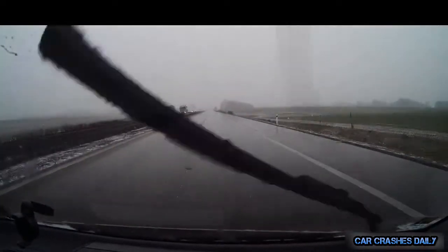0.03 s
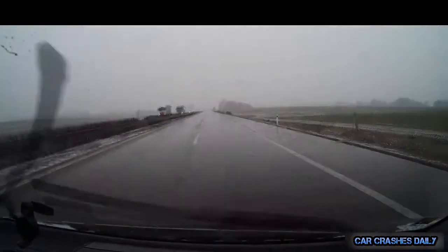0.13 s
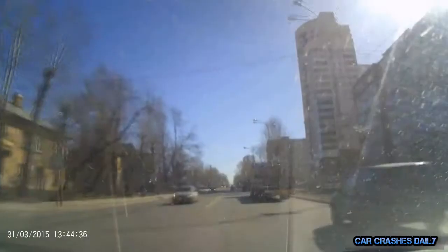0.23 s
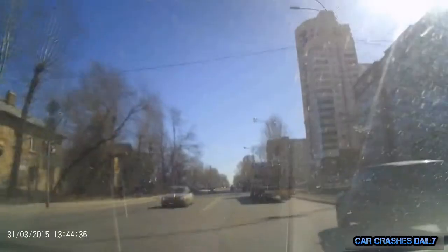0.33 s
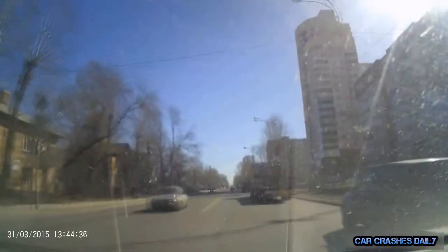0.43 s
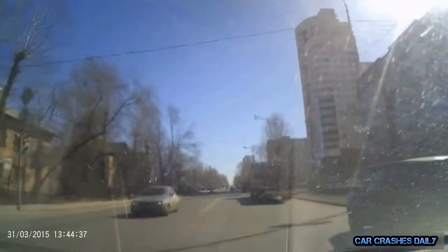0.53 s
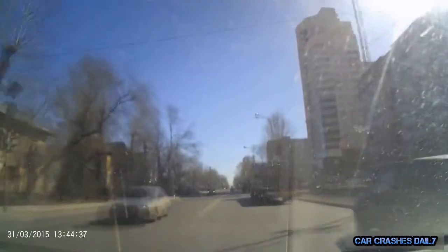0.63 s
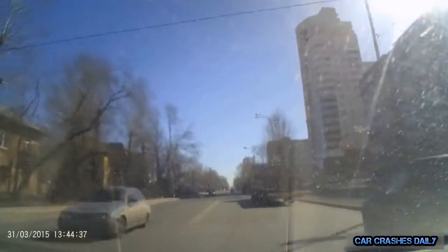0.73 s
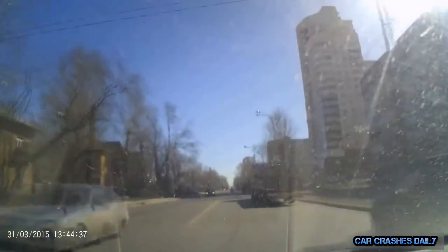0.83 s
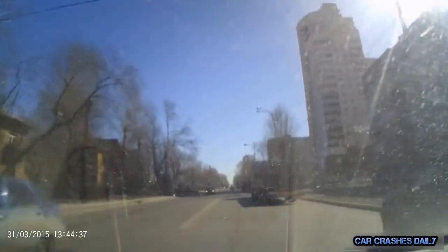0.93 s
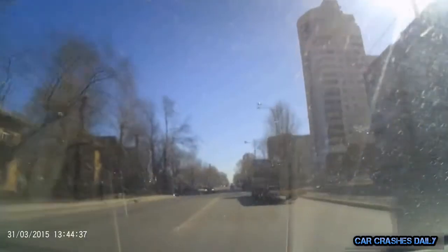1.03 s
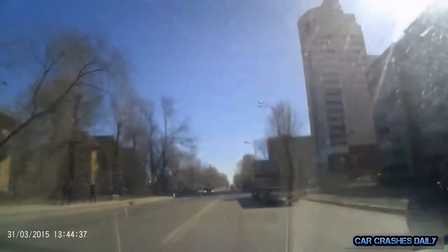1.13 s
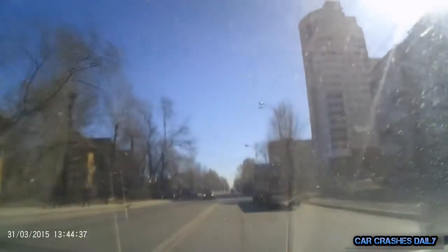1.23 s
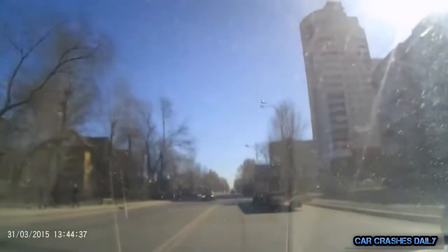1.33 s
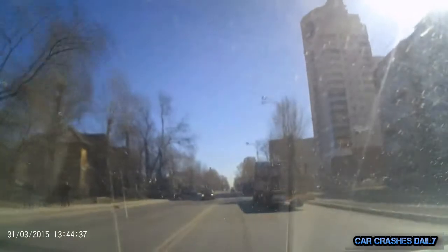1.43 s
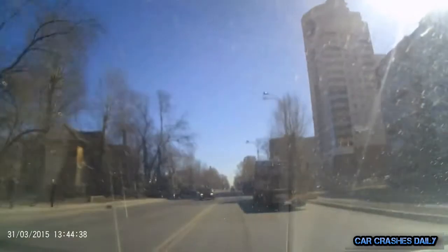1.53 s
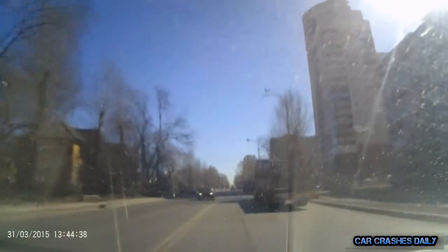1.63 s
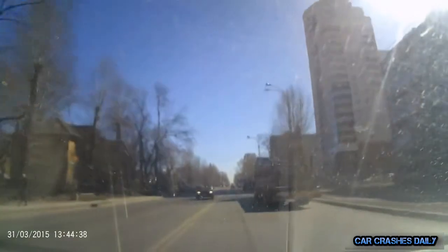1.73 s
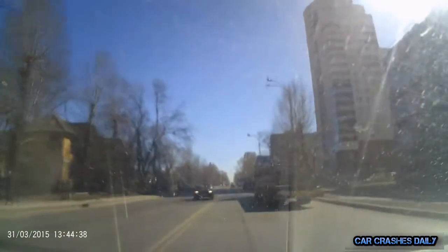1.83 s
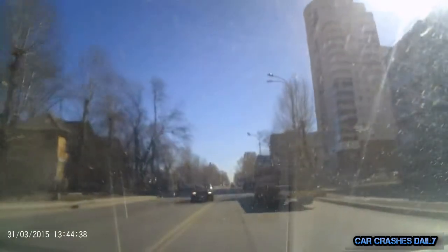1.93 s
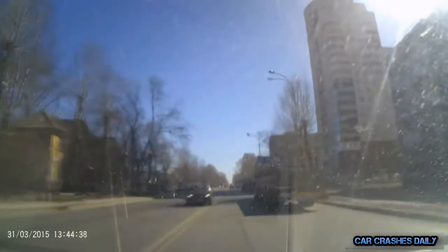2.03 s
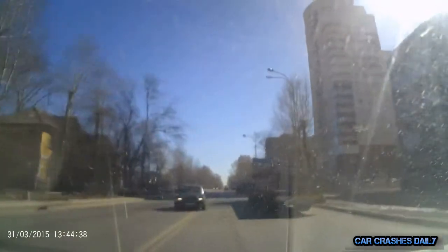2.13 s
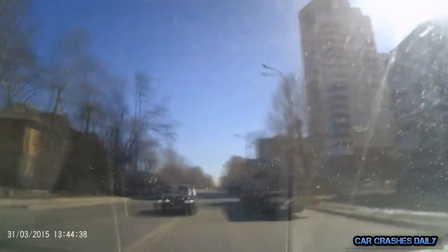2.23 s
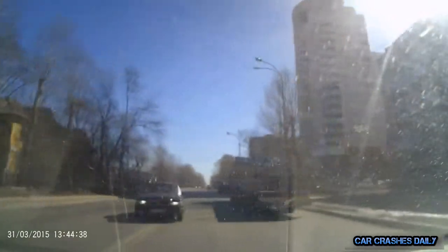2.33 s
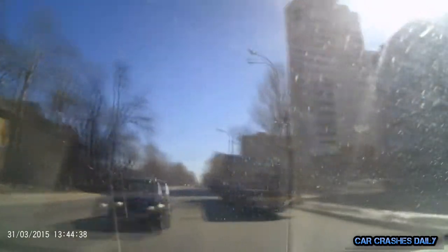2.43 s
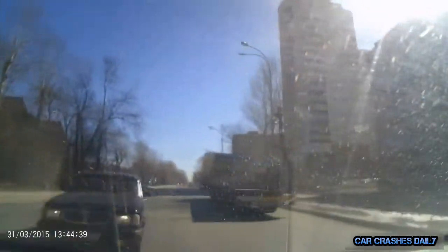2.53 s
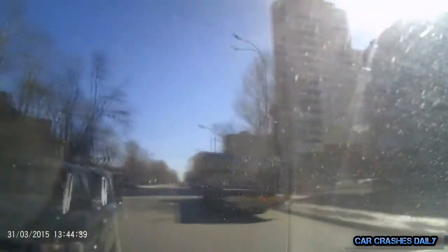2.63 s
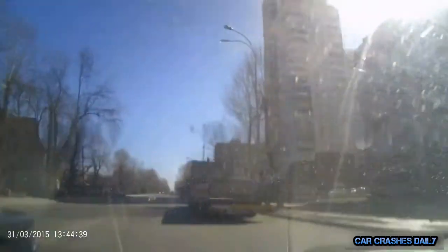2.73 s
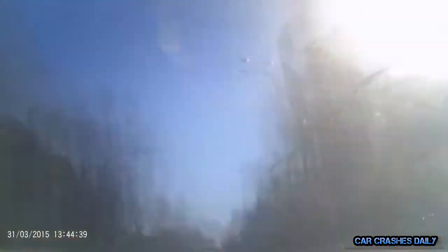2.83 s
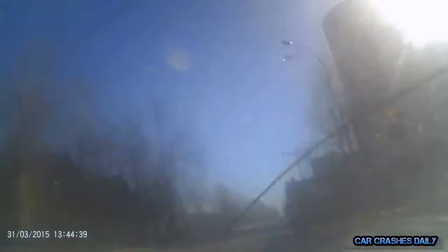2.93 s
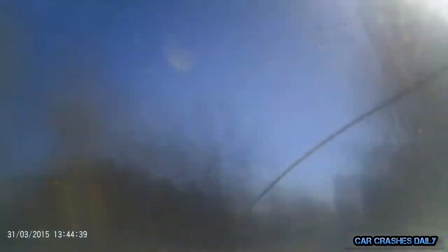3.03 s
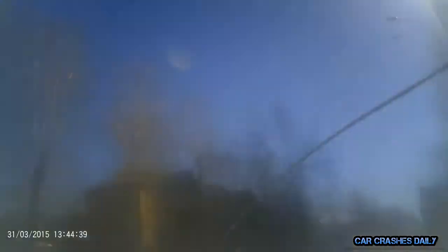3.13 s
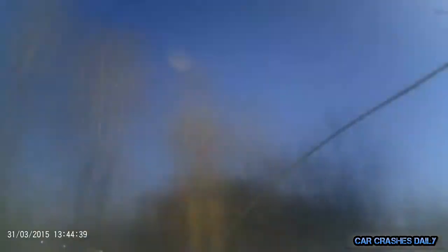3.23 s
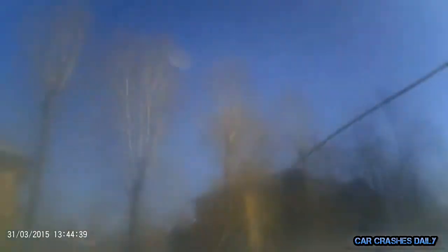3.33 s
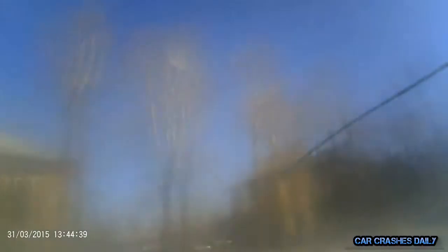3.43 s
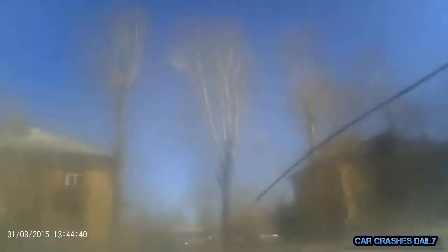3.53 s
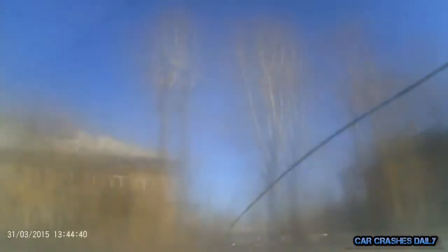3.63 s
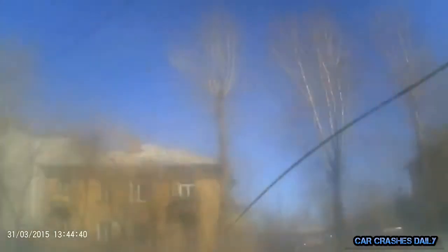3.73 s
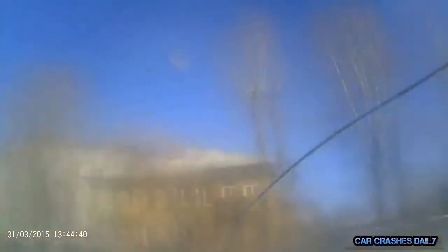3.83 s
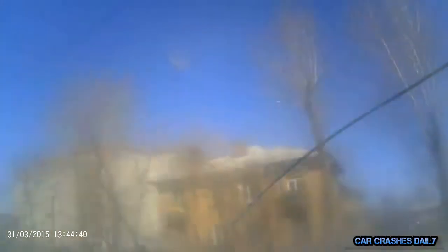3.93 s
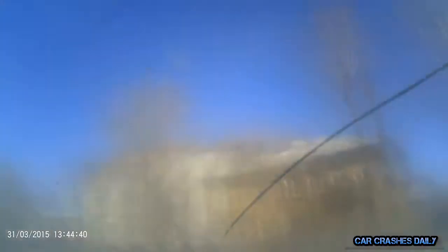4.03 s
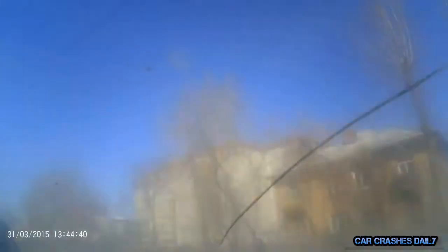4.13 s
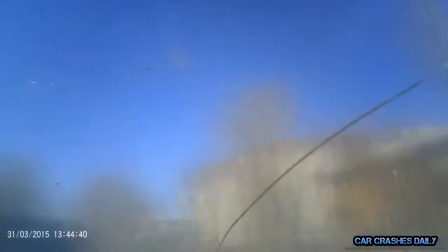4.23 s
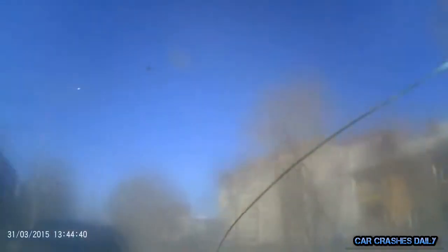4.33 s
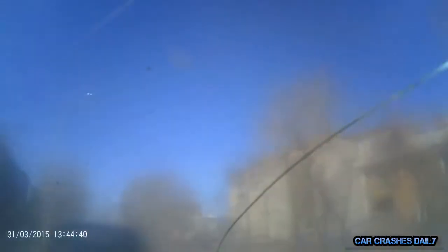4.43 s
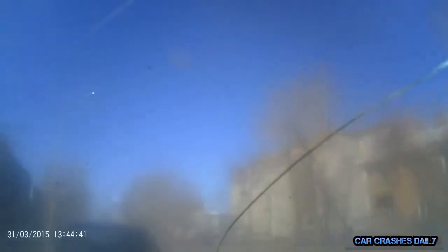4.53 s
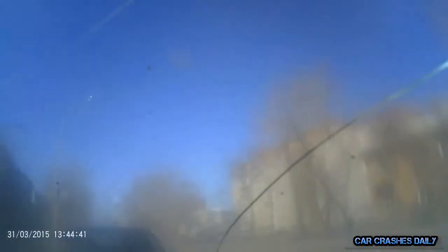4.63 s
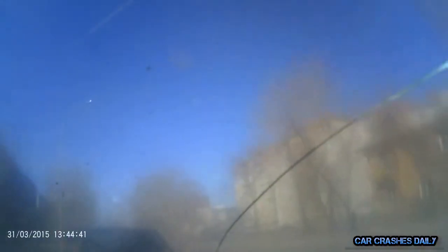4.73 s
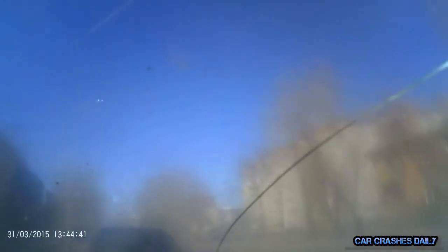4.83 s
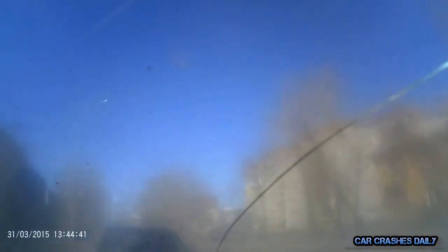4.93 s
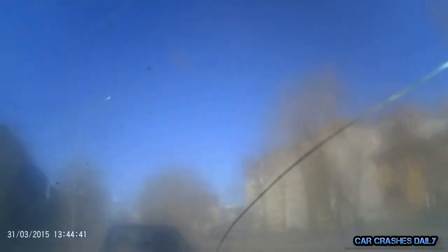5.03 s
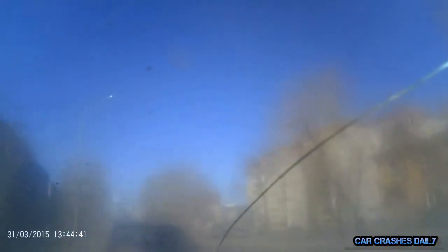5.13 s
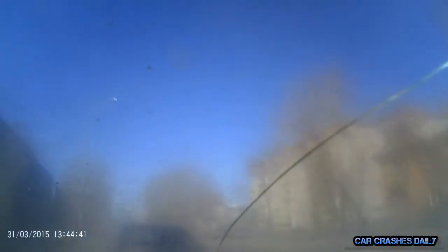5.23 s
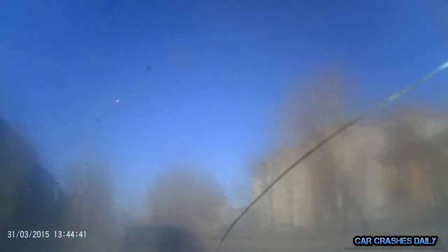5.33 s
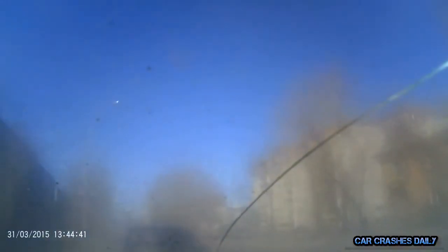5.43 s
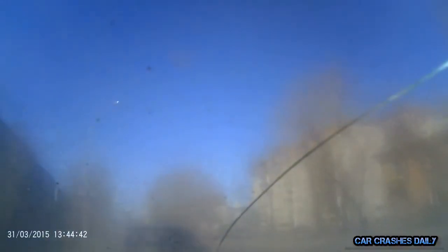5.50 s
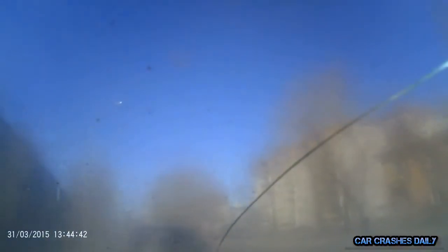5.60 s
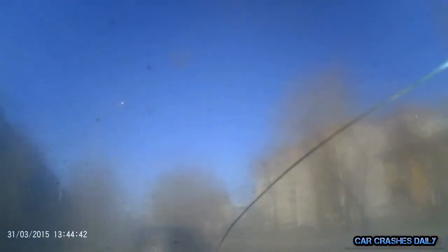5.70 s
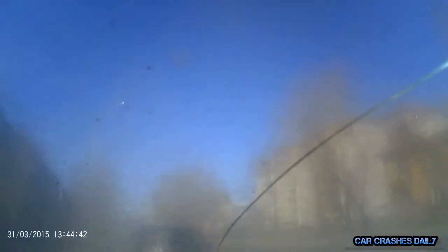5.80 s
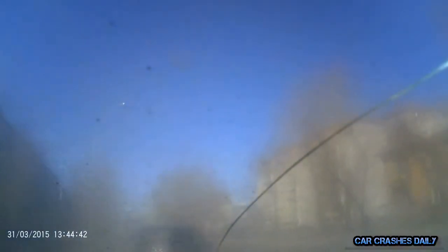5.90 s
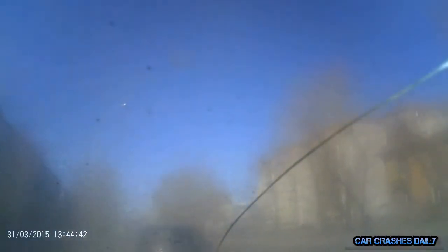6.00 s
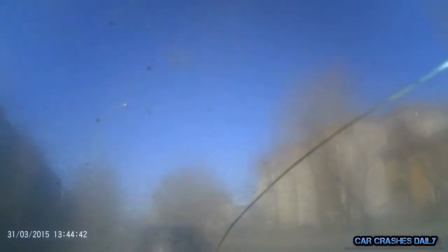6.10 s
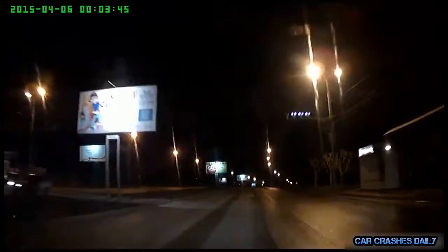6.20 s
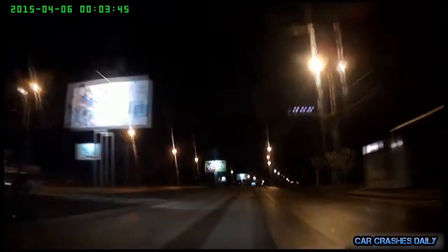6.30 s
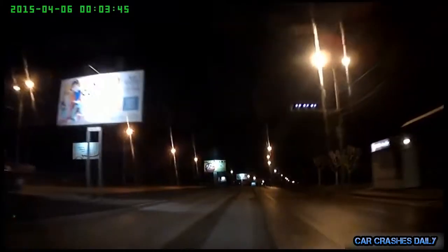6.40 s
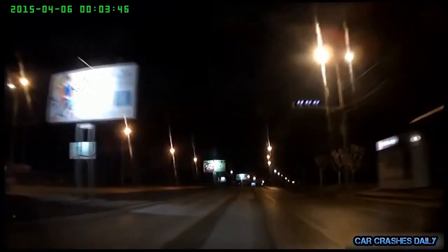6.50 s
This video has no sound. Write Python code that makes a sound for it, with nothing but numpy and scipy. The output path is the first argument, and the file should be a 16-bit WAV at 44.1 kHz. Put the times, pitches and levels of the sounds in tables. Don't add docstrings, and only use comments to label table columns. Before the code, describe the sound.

Close inside a car cabin, tyres and engine rumble low with faint air hiss. Suddenly two crushing impacts overload the microphone, with tearing metal and harsh fizz. The wreck slides: rough broken rubber squeals, metal scraping, dense cracks, heavy knocks and small ringing clinks. It lurches over a kerb with deep thumps, debris thins out, and the engine's low tone sinks until an abrupt cut.

```python
import sys
import numpy as np
from scipy import signal
from scipy.fft import rfft, irfft
from scipy.io import wavfile
from scipy.ndimage import uniform_filter1d

SR = 44100
rng = np.random.default_rng(int(sys.argv[2]) if len(sys.argv) > 2 else 0)


def amplitude_ratio(level_db):
    exponent = np.asarray(level_db, float) / 20
    return 10 ** exponent


def digitize_waveform(pressure):
    field = np.atleast_2d(pressure).T
    bounded = np.clip(field, -1, 1)
    quanta = np.round(bounded * 32767).astype(np.int16)
    wavfile.write(sys.argv[1], SR, quanta)


N = 289296
T = np.arange(N) / SR

# f/Hz, level per Hz/dB
ROAD_SPECTRUM = [(12, -32), (20, -0.5), (69, -1), (98, -9.5), (134, -6.5), (163, -20), (219, -20.5),
                 (261, -25.5), (376, -27), (418, -29), (693, -34.5), (870, -33.5), (1300, -49),
                 (1690, -72.5), (2860, -120)]
# f/Hz, level per Hz/dB
HISS_SPECTRUM = [(710, -21.5), (1200, -1), (1410, -1), (1650, -9), (2040, -10.5), (2600, -16.5),
                 (3840, -18.5), (5440, -26), (6940, -22.5), (8210, -25), (10400, -21), (11200, -29.5),
                 (14300, -28), (15000, -43.5)]
ROAD_DB, HISS_DB = -17.5, -47.5
# f/Hz, width/Hz, level/dB, unsteadiness/dB
PANEL_HUM = [
    (363.5, 32, -47.5, 4.5),
    (870, 54, -50, -0.5),
    (6960, 820, -70.5, 6.5),
    (3800, 220, -67, 2),
]

# t/s, peak level/dB, ring f/Hz, ring level re peak/dB
HARD_CRACKS = [(2.46, -39, 3230, -4), (2.9295, 0, 4120, -6.5), (2.9618, -9.5, 5430, -14.5),
               (3.009, -11, 3960, -17), (3.0535, -14, 3850, -20), (3.127, -5.5, 2980, -13),
               (3.1672, -7.5, 4150, -10), (3.1998, -8.5, 4070, -7), (3.2302, -1, 3980, -27),
               (3.291, -8, 4140, -25), (3.473, -5.5, 4240, -14), (3.3393, -15.5, 3100, -11),
               (3.5058, -16, 3420, -5), (3.6522, -9, 3730, -20), (3.5647, -1, 3480, -31),
               (3.6667, -8.5, 3725, -25), (3.688, -9.5, 3050, -10), (3.7109, -4, 3330, -18),
               (3.792, -3.5, 3090, -11), (3.8247, -9, 3800, -11), (3.8602, -4, 3110, -9),
               (3.8907, -7, 3010, -4), (3.955, -7.5, 3850, -12), (4.05, -26.5, 2600, -10),
               (4.1326, -17, 2210, -3.5), (4.4393, -26, 3670, -15), (4.495, -17.5, 3670, -4.5),
               (4.55, -20, 2780, -16), (4.583, -19, 2380, -13), (4.609, -17.5, 3330, -13),
               (4.8924, -21, 3670, -15), (5.095, -19, 2820, -23), (5.1825, -24, 2210, -21),
               (4.5133, -13, 2980, -15), (4.621, -16.5, 5050, -8), (4.818, -9.5, 3250, -16),
               (4.857, -14, 2280, -9), (4.983, -18.5, 3080, -26), (4.93, -19.5, 2500, -20),
               (4.475, -23.5, 2800, -10), (5.1372, -17, 2550, -30), (5.508, -27.5, 2990, -16),
               (5.555, -21, 2798, -15), (5.8576, -33.5, 3220, 0)]
# t/s, peak level/dB, thud level re peak/dB
HEAVY_KNOCKS = [(2.956, -23.5, 22.5), (3.07, -21, 8.5), (3.098, -13.5, 17), (3.1663, -14, 14.5),
                (3.1995, -16.5, 17.5), (3.3624, -13.5, 16), (3.4219, -15, 17), (3.668, -5.5, 6),
                (3.794, -11.5, 13.5), (4.0832, -12, 18), (4.108, -16, 12), (4.178, -21, 12),
                (4.2121, -21, 13), (4.239, -17.5, 0), (4.278, -18.5, -2), (4.3519, -15, 19),
                (4.398, -13, 5), (4.4296, -15, 8), (4.4642, -19.5, 28), (4.03, -18, 16), (4.659, -25.5, 21),
                (4.8007, -29, 19), (4.9181, -20.5, 8.5), (4.9666, -11, 6.5), (5.228, -15, 9.5),
                (2.89, -17.5, 11), (2.924, -17, 9), (4.06, -26, 16), (4.905, -26, 19),
                (5.6097, -35.5, 25.5)]
CRACK_T60_S, KNOCK_T60_S, CRACK_THUD_DB = 0.053, 0.052, -1

# t/s, cabin pressure/rails, crunch level re rail/dB
BLOWS = [(2.541, 2.5, 4.5), (2.557, 9, 11.5), (2.565, -8, 15.5), (2.568, 14.5, -7), (2.571, -5, 7),
         (2.579, 2, 8.5), (2.59, -16, 4), (2.614, -14, -30), (2.6326, -1, -25.5), (2.635, -1, -38.5),
         (2.647, -1, -20.5), (2.661, -5, 20), (2.686, -5.5, 11), (2.696, -3, 19), (2.7, -5, 8),
         (2.709, 6, 14.5), (2.727, 3.5, 10), (2.736, 6.5, 6.5), (2.744, -2.5, -16)]
# t/s, held/s, pressure/rails, pressure under/rails, crunch level/dB
REBOUNDS = [
    (2.772, 0.01, 0.83, -1.46, -11),
    (2.827, 0.0041, 0.37, -1.28, -15.5),
    (2.867, .011, 0.71, -0.75, -13.5),
    (2.912, 0.013, 1.03, -0.98, -21),
]
SECOND_BLOW_S, BLOWS_END_S, SETTLED_S = 2.589, 2.748, 2.956
BUMPER_HZ, SHEET_HZ, TRIM_HZ = 480, 2750, 2000
LET_GO_S, LET_GO_TILT, HELD_DB, UNDER_DB = 0.008, 0.66, -4.5, -14

# t/s, boom level/dB
CABIN_BOOM = [(2.93, -6), (3.32, -19.5), (3.95, -17.5), (4.15, -12.5), (4.5, -22), (4.8, -12.5),
              (5.3, -14.5), (5.85, -18.5), (6.03, -11), (6.17, -26)]
# t/s, weight on the ground level/dB, sliding speed level/dB
SLIDE_PATH = [(2.93, -2, 0), (3.8, -3, 2), (3.92, -7, 0), (4.0, -5, -2.5), (4.24, 6, -11), (4.62, -3, -10),
              (4.95, -3.5, -15), (5.07, -4.5, -14.5), (5.3, -5, -24), (5.4, -5.5, -25), (5.98, -4.5, -29.5),
              (6.15, -13, -22)]
# t/s, length/s, wheel lift level/dB, floor pan lift level/dB
GROUND_BUMPS = [(2.978, 0.04, -13, 5.5), (3.022, 0.049, 4, 6.5), (3.089, 0.079, 10, 5.5),
                (3.38, 0.076, 5, 2), (3.691, 0.073, 10, 5), (4.096, 0.13, 10, 7.5), (3.904, .2, 5, 1.5),
                (4.22, 0.16, 1, 3.5), (4.678, 0.067, 10.5, 15.5), (4.83, 0.092, 7, 7.5),
                (4.954, 0.29, 2.5, 11), (5.294, 0.12, 1.5, 6), (5.556, 0.15, -4, 8.5),
                (5.978, 0.26, -10, 3)]
# t/s, length/s, level/dB
LULLS = [(3.046, 0.015, -10), (3.222, 0.017, -8), (3.464, 0.011, -7), (3.647, 0.035, -3), (3.853, .02, -1),
         (3.885, 0.019, -2), (4.023, 0.014, -8.5), (4.169, 0.011, -11), (4.422, 0.011, -9),
         (4.487, 0.015, -13), (4.537, .02, -4), (4.642, .02, -2.5), (4.72, 0.013, -5), (4.782, 0.03, -4),
         (4.845, 0.018, -0.5), (4.887, .03, -4), (4.94, 0.022, -2.5), (5.058, 0.036, -4.5),
         (5.204, .03, -0.5)]
# base level/dB, powers of weight, speed, wheel bumps, floor pan bumps [no unit]
LAYER_FOLLOWS = [
    (-19, 0.92, 0.011, 1.21, .01),
    (-23.5, 1.12, 0.0088, 0.19, 1),
    (-18.5, 0.55, 0.53, .01, 0.36),
    (-27, 0.011, 1, .01, 0.24),
]
# f/Hz, level per Hz/dB
THUMP_SPECTRUM = [(26, -44), (45, -7), (53, -3), (70, -7), (81, -9), (124, -12), (135, -3), (162, -12.5),
                  (200, -24.5), (260, -48), (440, -120)]
# f/Hz, level per Hz/dB
RUMBLE_SPECTRUM = [(100, -43), (170, -2.5), (264, -5.5), (316, -3.5), (545, -10), (601, -12), (695, -17.5),
                   (900, -11.5), (1170, -65.5), (1980, -120)]
# f/Hz, level per Hz/dB
SCRAPE_SPECTRUM = [(240, -35), (400, -34.5), (426, -8.5), (671, 0), (803, -0.5), (1090, 0), (1280, -0.5),
                   (1560, 2), (1700, -4), (2600, -15), (3380, -16.5), (5720, -120)]
# f/Hz, level per Hz/dB
DEBRIS_SPECTRUM = [(1060, -29.5), (1800, -3), (2160, -5), (2560, -8.5), (3080, -4), (3570, -3.5),
                   (3930, -2.5), (4730, -8.5), (5080, -10), (5490, -6.5), (7030, -14.5), (9070, -7),
                   (10900, -16), (13000, -18), (14700, -24)]
# f/Hz, level/dB, t60/s
SHARD_RINGS = [(1650, 2, 0.049), (1990, -4, 0.031), (2980, -9, .04), (3480, -2.5, .03), (3850, 1.5, 0.055),
               (3980, 1.5, 0.022), (4420, -11.5, .04), (5690, 3, 0.0298), (6130, -10, 0.026)]

# t/s, peak level/dB, ring f/Hz, t60/s
CLINKS = [(2.931, -15, 4100, 0.054), (2.9644, -16, 5490, 0.067), (3.171, -19, 4080, .04),
          (3.2008, -12, 4030, 0.12), (3.2296, -9, 4080, .05), (3.292, -27, 4120, .05),
          (3.3638, -10, 1474, .07), (3.4205, -23, 4130, 0.091), (3.4731, -17.5, 4040, 0.047),
          (3.478, -19, 4500, 0.043), (3.5055, -24, 2340, .09), (3.51, -18, 1487, .08),
          (3.5684, -23, 3540, .05), (3.605, -14, 1955, 0.055), (3.6534, -16, 5500, 0.035),
          (3.6686, -9.5, 1514, 0.063), (3.6883, -11.5, 3124, 0.049), (3.712, -16, 3370, 0.042),
          (3.7566, -23, 3183, 0.046), (3.7951, -11.5, 3020, 0.05), (3.8, -16, 6180, 0.041),
          (3.815, -15, 2230, .06), (3.82, -20, 3800, .12), (3.8263, -15, 3170, .04),
          (3.861, -10.5, 3090, .06), (3.861, -10, 1640, 0.071), (3.882, -15.5, 4000, .05),
          (3.8908, -12.5, 3022, 0.048), (3.955, -20, 3860, 0.085), (4.0706, -28, 3980, .04),
          (4.4958, -19, 3650, .04), (4.622, -27, 5440, 0.055), (4.8924, -32, 3690, .04),
          (4.968, -15.5, 1593, 0.067), (4.865, -32, 1400, 0.058), (4.92, -21, 1650, .07),
          (4.1, -12, 593, 0.11), (3.015, -15, 902, .1), (3.098, -8, 884, 0.088), (3.2, -6.5, 1417, 0.045),
          (3.69, -8.5, 295, 0.07), (3.805, -13, 805, 0.12), (5.655, -43, 2866, 0.11)]
# ratio of f [no unit], level/dB
CLINK_PARTIALS = [
    (1, 0.5),
    (1.06, -15.5),
    (1.82, -12.5),
]
# t/s, squeal f/Hz, level/dB
TYRE_SKID = [(2.95, 880, -20.5), (3.1, 876.6, -22.5), (3.3, 866, -16), (3.45, 741.6, -17.5),
             (3.6, 694, -27), (3.75, 786, -32.5), (3.9, 800, -31), (4.05, 813, -31), (4.15, 785, -71)]
# t/s, squeal f/Hz, level/dB
REAR_SKID = [(3.3, 601.2, -31), (3.45, 650.6, -21.5), (3.54, 780, -21), (3.66, 800, -19),
             (3.72, 620.7, -21), (3.8, 760, -20.5), (3.9, 919, -30), (4.0, 800, -22), (4.1, 606, -26),
             (4.2, 580, -63)]
# t/s, peak level/dB
TICKS = [(2.965, -9), (3.011, -12), (3.0546, -16), (3.0711, -15.5), (3.0975, -12), (3.1265, -8.5),
         (3.1646, -9.5), (3.2005, -5), (3.2297, -11), (3.289, -10.5), (3.34, -8.5), (3.3657, -7.5),
         (3.4213, -11), (3.4716, -7.5), (3.5056, -12.5), (3.5636, -10.5), (3.6513, -9), (3.6687, -6.5),
         (3.7112, -8.5), (3.7376, -12.5), (3.7793, -6.5), (3.7946, -2), (3.8259, -7), (3.8611, -3.5),
         (3.8917, -2.5), (3.9421, -14), (3.9547, -8), (4.0309, -18), (4.0838, -12), (4.174, -17),
         (4.191, -20.5), (4.3382, -25), (4.3517, -21.5), (4.3991, -17.5), (4.4001, -22), (4.4636, -21.5),
         (4.4955, -11), (4.5707, -22.5), (4.7996, -17), (4.856, -16), (4.9548, -15), (4.972, -11),
         (5.2282, -29), (5.2282, -10.5)]
TICK_T60_S, TICK_DB, TICK_BODY_DB = 0.016, -11.5, -1
# t/s, length/s,
# pressure/rails
LURCHES = [(2.974, 0.041, 0.5), (3.025, 0.014, 0), (3.041, 0.03, -0.8), (3.064, 0.029, 0.78),
           (3.086, 0.024, -3), (3.103, 0.018, 1.1), (3.117, 0.029, -1), (3.132, 0.016, 0.67),
           (3.152, 0.017, 1), (3.166, 0.012, 0.74), (3.191, 0.023, 0.5), (3.221, 0.03, -1.3),
           (3.235, 0.035, 1.22), (3.285, 0.02, 1.08), (3.303, 0.028, -0.1), (3.332, 0.018, 0.6),
           (3.394, 0.016, 0.1), (3.411, 0.025, -1.2), (3.437, 0.02, 0.4), (3.466, 0.011, 0.5),
           (3.472, 0.013, 1), (3.569, 0.031, .5), (3.686, 0.0061, 1), (3.701, 0.0062, -1.1),
           (3.818, 0.01, 0.5), (3.981, 0.03, -.5), (3.999, 0.013, 0.6), (4.018, .025, 0.5),
           (4.036, 0.029, 1.1), (4.164, 0.018, -0.9), (4.185, 0.027, 0.5), (4.203, 0.043, -1),
                (4.336, 0.015, -1.5), (4.344, 0.015, 3), (4.368, 0.0087, 5), (4.382, 0.022, -5.5),
                (4.398, 0.0068, 0.5), (4.427, 0.022, -3), (4.43, 0.022, 3.5), (4.451, 0.014, -1.2),
                (4.471, 0.017, 2.5), (4.495, 0.038, -0.6), (4.51, 0.028, 1), (4.534, 0.029, -0.7),
                (4.552, 0.011, 1.5), (4.702, 0.011, 1), (4.709, 0.015, 0.6), (4.733, 0.016, 1.2),
                (4.808, 0.015, 0.2), (4.819, 0.024, -0.8), (5.205, 0.012, 0.4), (5.228, 0.026, 0.87),
                (5.372, 0.018, 0.7)]
# t/s, firing f/Hz, level/dB
ENGINE_SPEED = [(4.7, 212.2, -32), (4.95, 205.6, -31.5), (5.13, 204.8, -24), (5.28, 193.4, -29),
                (5.45, 197.1, -26), (5.56, 191.6, -33.5), (5.7, 187.4, -22.5), (5.85, 174.7, -25.5),
                (5.95, 162.5, -32), (6.03, 157.9, -22.5), (6.2, 147, -19.5), (6.32, 140.9, -21.5)]
# multiple of firing f [no unit], early level/dB, late level/dB
SHAFT_ORDERS = [
    (1, -3, 1),
    (1.5, -9.5, -21.5),
    (2, -12, -22.5),
    (2.5, -23, -28),
    (3, -21.5, -22.5),
]

RAIL, CEILING = 0.75, 0.72
SLEW_HZ, COUPLING_HZ, TOP_HZ = 17000, 6.7, 14650
HASH_DB, FIZZ_DB, FIZZ_TOP_DB = -20, -26.5, -29
FIZZ_TAIL_S, FIZZ_TOP_HZ = 0.022, (14400, 15500)
KEEP_HZ, WEAK_DB = 3000, -1.6
STARVED_S, STARVED_HZ, PATCH_DB = (4.0, 5.235), 4500, -5.5
ON_S, OFF_S, SETTLE = 0.3168, 6.32, 0.007


def level(x, db):
    return x * amplitude_ratio(db) / np.sqrt(np.mean(x ** 2))


def band(x, lo_hz, hi_hz):
    return signal.sosfilt(signal.butter(2, [lo_hz, hi_hz], "band", fs=SR, output="sos"), x)


def hiss_band(lo_hz, hi_hz):
    return level(band(rng.standard_normal(N), lo_hz, hi_hz), 0)


def colour(x, spectrum):
    hz, db = np.transpose(spectrum)
    log_f = np.log(np.fft.rfftfreq(N, 1 / SR) + 1)
    gain = amplitude_ratio(np.interp(log_f, np.log(hz), db, -120, -120))
    return level(irfft(rfft(x) * gain, N), 0)


def walk(rate):
    k = int(SR / rate)
    held = np.repeat(rng.standard_normal(N // k + 1), k)[:N]
    return 1.464 * uniform_filter1d(uniform_filter1d(held, k), k)


def grains(rate, spread_db):
    size = amplitude_ratio(spread_db * np.minimum(rng.exponential(size=N), 3.5)) * rng.standard_normal(N)
    return level(size * (rng.random(N) < rate / SR), 0)


def curve(table, column):
    rows = np.array(table)
    fade_in = np.clip((T - rows[0, 0]) / 0.068, 0, 1)
    return amplitude_ratio(np.interp(T, rows[:, 0], rows[:, column])) * fade_in


def strike_fade(t, db, t60, attack_s):
    return amplitude_ratio(db) * np.exp(-np.log(1000) * t / t60) * np.minimum(t / attack_s, 1)


def road():
    noise, swell = colour(rng.standard_normal(N), ROAD_SPECTRUM), walk(5.2)
    edges = 11 * 2.0 ** np.arange(9)
    below = [signal.sosfilt(signal.butter(2, f, fs=SR, output="sos"), noise) for f in edges]
    rolling = sum(amplitude_ratio(0.5 * swell + walk(10)) * (b - a) for a, b in zip(below, below[1:]))
    until_crash = np.clip((BLOWS[0][0] + 0.086 - T) / 0.05, 0, 1)
    hiss = colour(rng.standard_normal(N), HISS_SPECTRUM) * amplitude_ratio(0.35 * swell + 0.48 * walk(19))
    hiss_drop = amplitude_ratio(-5.0 * (T > SETTLED_S))
    return level(rolling, ROAD_DB) * until_crash + level(hiss, HISS_DB) * hiss_drop


def hum():
    return sum(amplitude_ratio(db) * hiss_band(hz - width / 2, hz + width / 2) * amplitude_ratio(sway_db * np.tanh(2 * walk(14)))
               for hz, width, db, sway_db in PANEL_HUM)


def rattles():
    t = np.arange(SR // 4) / SR
    crack, ring, thud = np.zeros((3, N + len(t)))
    strikes = [(s, db, hz, CRACK_THUD_DB, CRACK_T60_S, ring_db) for s, db, hz, ring_db in HARD_CRACKS]
    strikes += [(s, db, 3000, thud_db, KNOCK_T60_S, -18) for s, db, thud_db in HEAVY_KNOCKS]
    for s, db, hz, thud_db, t60, ring_db in strikes:
        noise = rng.standard_normal((3, len(t)))
        fade = strike_fade(t, db, t60, 0.0016)
        span = slice(int(s * SR), int(s * SR) + len(t))
        crack[span] += fade * noise[0]
        ring[span] += fade * level(band(noise[1], hz - 160, hz + 160), ring_db)
        ring[span] += fade * level(band(noise[1], 0.46 * hz, 0.8 * hz), ring_db - 3.0)
        thud[span] += fade * level(band(noise[2], 268.5, 1380), thud_db - 11.5)
    cracks = colour(crack[:N], DEBRIS_SPECTRUM) * np.std(crack[:N]) * amplitude_ratio(-10.5)
    return cracks + ring[:N] + thud[:N]


def collision():
    rows = [(s, p, db, BUMPER_HZ if s < SECOND_BLOW_S else SHEET_HZ) for s, p, db in BLOWS]
    for s, held, p, under, db in REBOUNDS:
        rows.append((s, p, db + HELD_DB, TRIM_HZ))
        rows.append((s + held, 0.05, db, TRIM_HZ))
        rows.append((s + held + LET_GO_S, under, db + UNDER_DB, TRIM_HZ))
    rows.append((SETTLED_S, 0, -94, TRIM_HZ))
    s, push, crunch_db, hz = np.transpose(rows)
    state = np.searchsorted(s, T) - 1
    on = state >= 0
    surge = uniform_filter1d(uniform_filter1d(push[state] * on, 55), 55)
    for s, held, *_ in REBOUNDS:
        ramp = 1 - 2 * (T - s - held) / LET_GO_S
        surge += LET_GO_TILT * ramp * (np.abs(ramp) < 1)
    dull, bright = hiss_band(100, 1300), hiss_band(750, 5400)
    share = np.clip(hz[state] / 3500, 0, 1)
    tear = (np.sqrt(1 - share) * dull + share * bright) * amplitude_ratio(1.7 * walk(200))
    return RAIL * (surge + amplitude_ratio(crunch_db[state]) * on * tear)


def fizz(x):
    power = band(x, 1700, 8000) ** 2 * (T < BLOWS_END_S)
    k = int(FIZZ_TAIL_S * SR)
    lasting = np.sqrt(np.abs(uniform_filter1d(power, k, origin=(k - 1) // 2)))
    now = np.sqrt(np.abs(uniform_filter1d(power, 200)))
    noise = rng.standard_normal(N)
    wide = level(band(band(noise, 500, 13000), 500, 13000), 0)
    top = level(band(band(noise, *FIZZ_TOP_HZ), *FIZZ_TOP_HZ), 0)
    rise = np.clip((T - BLOWS[0][0]) / 0.2, 0, 1)
    return amplitude_ratio(FIZZ_DB) * lasting * wide + amplitude_ratio(FIZZ_TOP_DB) * now * rise * top


def lulls():
    total_db = np.zeros(N)
    for s, length, db in LULLS:
        sink = np.clip((T - s) / length + 1, 0, 1)
        snap_back = np.clip((s + length / 2 - T) / 0.0025, 0, 1)
        total_db += db * sink * snap_back
    return amplitude_ratio(total_db)


def shards():
    out = np.zeros(N)
    for hz, db, t60 in SHARD_RINGS:
        pole = np.exp(2j * np.pi * hz / SR - np.log(1000) / (t60 * SR))
        out += level(signal.lfilter([1], [1, -pole], grains(120, 2.5)).imag, db)
    return level(out, 0)


def slide():
    shake = np.tanh(walk(30))
    boom = level(band(band(rng.standard_normal(N), 18.7, 37.9), 21.4, 102), 0)
    thump = colour(rng.standard_normal(N), THUMP_SPECTRUM) * amplitude_ratio(1.2 * walk(41))
    rumble = colour(rng.standard_normal(N) + 0.5 * grains(150, 1.2), RUMBLE_SPECTRUM)
    rumble = rumble * amplitude_ratio(shake + 1.7 * walk(40))
    scrape = colour(rng.standard_normal(N) + 0.46 * grains(400, 2.3), SCRAPE_SPECTRUM)
    scrape = scrape * amplitude_ratio(2.8 * shake + 2.0 * walk(60))
    debris = colour(rng.standard_normal(N) + 0.45 * grains(700, 3.7), DEBRIS_SPECTRUM)
    debris = debris * amplitude_ratio(1.1 * shake + 2.53 * walk(70))
    hail = level(debris, -1.2) + level(shards(), -9.0)
    lull_gain = lulls()
    layers = (level(thump, 0.4), level(rumble, 0.19), lull_gain * level(scrape, -2.8), lull_gain * hail)

    weight, speed = curve(SLIDE_PATH, 1) + 1e-9, curve(SLIDE_PATH, 2) + 1e-9
    wheel_db, pan_db = np.zeros((2, N))
    for s, length, wheel_lift_db, pan_lift_db in GROUND_BUMPS:
        jolt = np.clip(1 - 2 * np.abs(T - s) / length, 0, 1)
        wheel_db += wheel_lift_db * jolt
        pan_db += pan_lift_db * jolt
    wheel, pan = amplitude_ratio(wheel_db), amplitude_ratio(pan_db)
    sliding = np.zeros(N)
    for (db, w, v, a, b), layer in zip(LAYER_FOLLOWS, layers):
        sliding += amplitude_ratio(db) * weight ** w * speed ** v * wheel ** a * pan ** b * layer
    return curve(CABIN_BOOM, 1) * boom + (T > SLIDE_PATH[0][0]) * sliding


def clinks():
    t = np.arange(SR // 4) / SR
    out = np.zeros(N + len(t))
    for s, db, hz, t60 in CLINKS:
        cycles = hz * t * (1 - 0.3 * t)
        tone = sum(amplitude_ratio(p_db) * np.sin(2 * np.pi * k * cycles) for k, p_db in CLINK_PARTIALS)
        start = int(s * SR)
        out[start:start + len(t)] += strike_fade(t, db, t60, 0.0017) * tone
    return out[:N]


def skid(table):
    rows = np.array(table)
    hz = np.interp(T, rows[:, 0], rows[:, 1]) * (1 + 0.045 * walk(45) + 0.1098 * walk(400))
    phase = 2 * np.pi * np.cumsum(hz) / SR
    grip = amplitude_ratio(5 * np.tanh(walk(45)) - 3.0)
    return curve(table, 2) * grip * (np.sin(phase) + 0.16 * np.sin(2 * phase))


def ticks():
    t = np.arange(SR // 20) / SR
    out = np.zeros(N + len(t))
    for s, db in TICKS:
        start = int(s * SR)
        out[start:start + len(t)] += strike_fade(t, db, TICK_T60_S, 0.0014) * rng.standard_normal(len(t))
    snaps = out[:N]
    mixed = colour(snaps, DEBRIS_SPECTRUM) + amplitude_ratio(TICK_BODY_DB) * colour(snaps, SCRAPE_SPECTRUM)
    return amplitude_ratio(TICK_DB) * mixed * np.std(snaps)


def lurches():
    out = np.zeros(N)
    for s, length, push in LURCHES:
        out += RAIL * push * np.cos(np.pi * np.clip((T - s) / length, -0.5, 0.5)) ** 2
    return out


def engine():
    rows = np.array(ENGINE_SPEED)
    hz = np.interp(T, rows[:, 0], rows[:, 1]) * (1 + 0.0038 * walk(40))
    phase = 2 * np.pi * np.cumsum(hz) / SR
    late = np.clip((T - 5.8) / 0.28, 0, 1)
    tone = sum(amplitude_ratio(early_db + late * (late_db - early_db) + 0.69 * walk(22)) * np.sin(k * phase)
               for k, early_db, late_db in SHAFT_ORDERS)
    return np.sqrt(2) * curve(ENGINE_SPEED, 2) * tone


def scene():
    before = road() + hum()
    crash = rattles() + collision()
    wreck = slide() + clinks() + skid(TYRE_SKID) + skid(REAR_SKID) + ticks() + lurches() + engine()
    return (before + crash + wreck)[None]


def thinned(x):
    f, t, z = signal.stft(x, SR, "cosine", nperseg=1024)
    size = uniform_filter1d(np.abs(z), size=3, axis=-2)
    strict = np.clip((f - KEEP_HZ) / (13000 - KEEP_HZ), 0, 1)[:, None] ** 0.5
    weak = amplitude_ratio(WEAK_DB + 1.5 * (t > STARVED_S[0]))
    keep = size > weak * strict * uniform_filter1d(size, size=24, axis=-2)
    patch = uniform_filter1d(size, size=12, axis=-2)
    treble = np.clip((f[:, None] - STARVED_HZ) / 4000, 0, 1) ** 0.3
    usual = uniform_filter1d(patch, size=7, axis=-1) * treble
    keep &= (patch > amplitude_ratio(PATCH_DB) * usual) | (t < STARVED_S[0]) | (t > STARVED_S[1])
    return signal.istft(z * keep, SR, "cosine", nperseg=1024)[1][..., :N]


def band_limit(x):
    return signal.sosfilt(signal.butter(12, 15800, fs=SR, output="sos"), x)


def record(dry):
    railed = dry / (1 + np.abs(dry / RAIL) ** 6) ** (1 / 6)
    railed = signal.lfilter(*signal.butter(1, SLEW_HZ, fs=SR), railed)
    coupled = signal.lfilter(*signal.butter(1, COUPLING_HZ, "high", fs=SR), railed)
    limited = np.clip(coupled, -CEILING, CEILING)
    busy = np.sqrt(uniform_filter1d(band(limited, 2100, 8000) ** 2, 900) + 1e-12)
    hashed = limited + amplitude_ratio(HASH_DB) * busy * hiss_band(300, 7400)
    low_pass = signal.ellip(8, 0.3, 55, TOP_HZ, fs=SR, output="sos")
    heard = signal.sosfilt(low_pass, thinned(hashed)) + fizz(limited)
    sound_on = np.clip((T - ON_S) / 0.006, 0, 1) * np.clip((OFF_S - T) / 0.0041, 0, 1)
    offset = SETTLE * np.clip((T - OFF_S) / 0.043, 0, 1)
    return band_limit(heard * sound_on + offset)


dry = scene()
out = record(dry)
digitize_waveform(out)
```